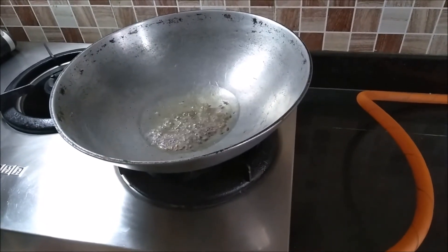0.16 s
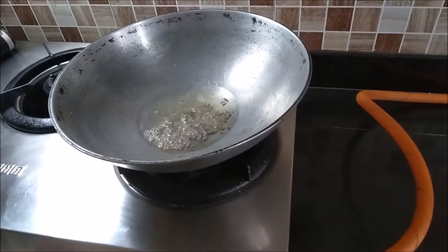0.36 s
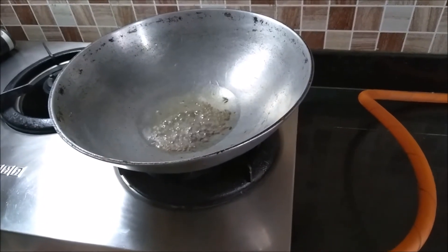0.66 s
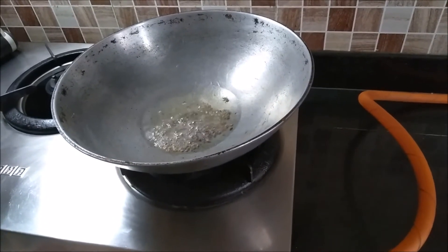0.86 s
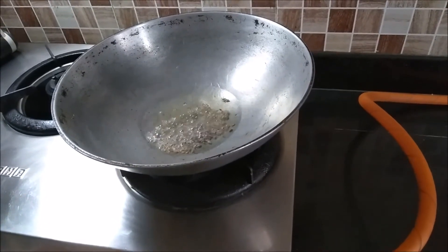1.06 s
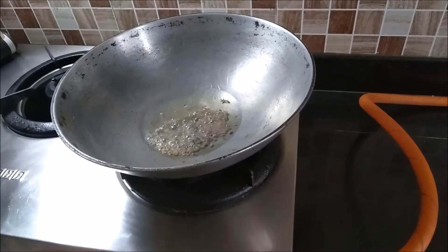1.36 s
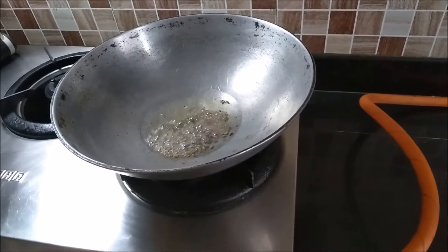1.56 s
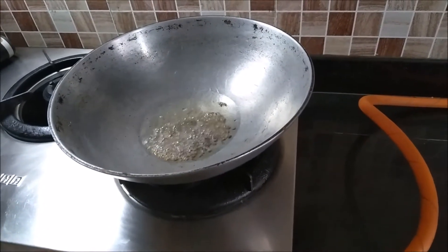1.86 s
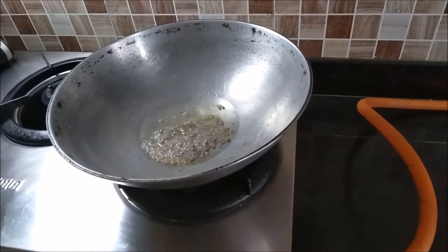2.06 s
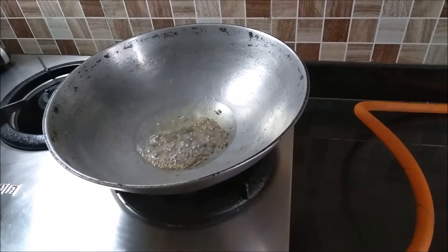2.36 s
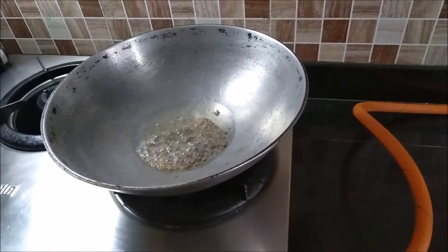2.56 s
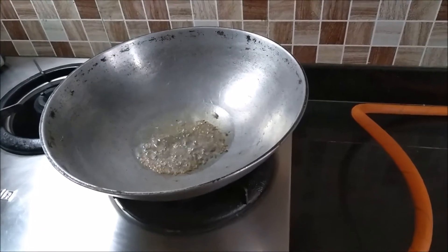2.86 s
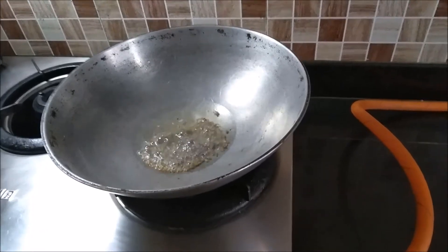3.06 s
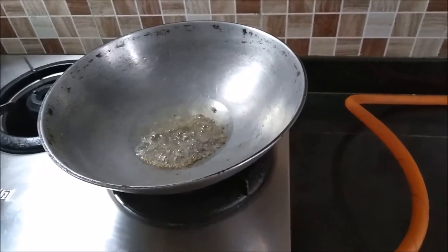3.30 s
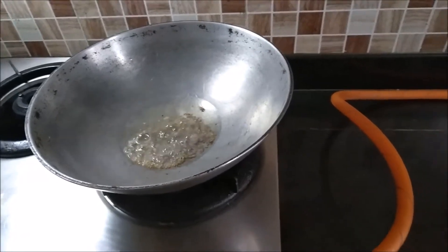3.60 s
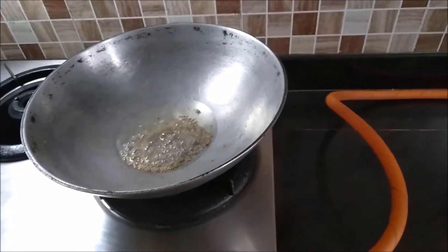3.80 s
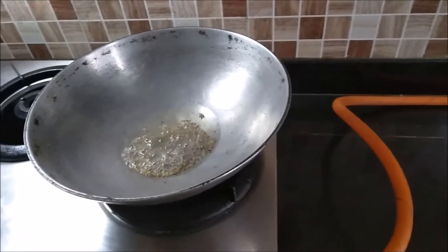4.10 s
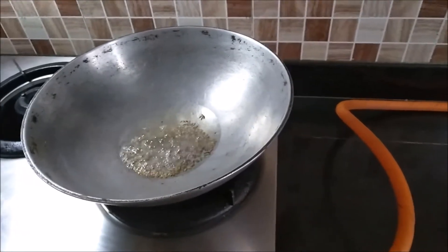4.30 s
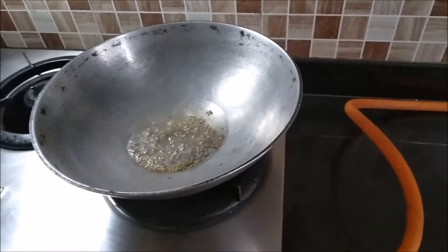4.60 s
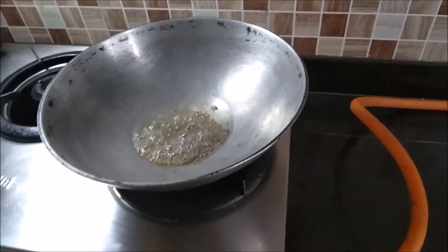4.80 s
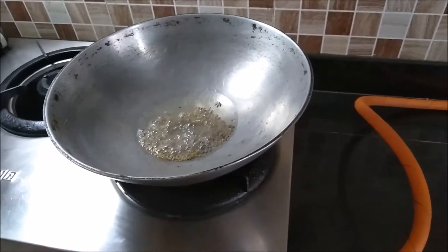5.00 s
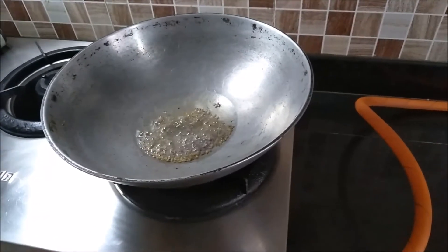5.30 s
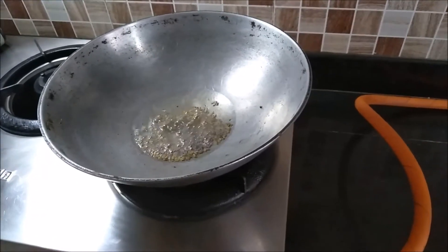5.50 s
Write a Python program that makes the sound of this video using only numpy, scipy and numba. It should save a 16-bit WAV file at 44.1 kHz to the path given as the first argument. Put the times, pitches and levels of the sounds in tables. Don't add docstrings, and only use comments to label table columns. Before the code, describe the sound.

Seeds crack sharply and irregularly in hot oil in a steel wok, with soft plops, over faint sizzle and low burner rumble.

```python
import sys
import numpy as np
from scipy import signal
from scipy.fft import rfft, irfft
from scipy.io import wavfile
from scipy.ndimage import uniform_filter1d
from numba import njit

SR = 44100
rng = np.random.default_rng(int(sys.argv[2]) if len(sys.argv) > 2 else 0)


def store_pcm(level_fs):
    pcm = np.round(np.clip(level_fs, -1, 1) * 32767).astype(np.int16)
    wavfile.write(sys.argv[1], SR, np.atleast_2d(pcm).T)


def gain_from_db(level_db):
    decades = np.asarray(level_db, float) / 20
    return 10 ** decades


N = 249165

# t/s, peak level/dB, centre f/Hz, treble level/dB, share thrown at the walls/dB
CRACKS = [(.1136, -8, 7670, -16.5, 2), (.3754, -28, 6920, -9.5, -7), (.8614, -34, 5260, -21.5, -9),
          (1.7348, -30, 6660, -5, 5), (1.9797, -34.5, 6400, -2, -12.5), (2.1632, -32.5, 6000, -24.5, 0),
          (2.3016, -29.5, 3960, -22, 2.5), (2.3527, -22, 5400, -17.5, -5), (2.6722, -33, 6180, -16, -3.5),
          (2.7921, -24.5, 7100, -11, 2), (3.0308, -34.5, 5700, -23, -7.5), (3.3237, -30.5, 4070, -15.5, 1),
          (3.7847, -33.5, 4420, -18.5, 1), (4.0811, -37.5, 5260, -21.5, -3), (4.4403, -31, 5100, -22, 2.5),
          (4.6803, -38, 5000, -16, -6), (4.9385, -31.5, 6460, -13, -12), (4.9867, -34, 5050, -29, -4.5),
          (5.0185, -33, 5560, -13.5, -16), (5.078, -36.5, 5200, -20.5, -4.5), (5.2914, -19, 4070, -18.5, 2),
          (5.3936, -21, 7440, -11.5, -9.5), (5.4254, -29.5, 7300, -4.5, -20), (5.517, -36, 4580, -26, -4.5)]
# t/s, peak level/dB, centre f/Hz
TICKS = [(0.2134, -55, 5400), (1.319, -53, 5200), (1.871, -55.5, 5800), (2.451, -48.5, 4740),
         (2.911, -47.5, 4370), (2.9779, -46.5, 4930), (3.2, -47.5, 5200), (3.4097, -41.5, 6250),
         (3.4454, -43.5, 4960), (3.676, -52.5, 5100), (4.3153, -42.5, 7900), (4.5336, -50, 5470),
         (4.654, -46.5, 4660), (4.8194, -41.5, 4770), (4.9623, -36.5, 4700), (5.196, -53, 4250),
         (5.4967, -39, 6500), (5.614, -56.5, 6180)]
SPLITS = [*CRACKS, *((*row, -17.5, -1.5) for row in TICKS)]
# f/Hz, level/dB
BED_TILT = [(500, -1), (2400, -1.5), (5000, -1), (8000, -3), (15000, 4.5)]
PORT_LAG = 6


def cracks(bus):
    highpass = signal.butter(3, 3300, "high", fs=SR, output="sos")
    for s, db, hz, treble_db, echo_db in SPLITS:
        spit_phase, crack_phase = rng.uniform(0, 2 * np.pi, 2)
        cycles = np.interp(db, [-41.5, -25.5], [1.83, 1.21])
        crack = gain_from_db(db + 5.5) * ring(hz, cycles, 0.0012, crack_phase)
        spit = gain_from_db(db + treble_db + 31) * ring(9400, 0.64, 0.018, spit_phase)
        crack, spit = signal.sosfilt(highpass, [crack, spit])
        bowl = rng.standard_normal(256)
        bowl[0] = 2.4
        direct = np.convolve(crack + 0.25 * spit, scatter(bowl, decay_s=0.002))
        add(bus, s, direct, crack + spit, -9.5 + echo_db, echo_db)


def plops(bus):
    # t/s, peak level/dB, pitch f/Hz, length/cycles
    pockets = [(.113, -34.5, 1980, 1.14), (.375, -48.5, 1880, 0.73), (1.318, -47.5, 1250, 0.37),
               (1.734, -41.5, 1640, 0.58), (1.979, -48.5, 1820, 0.71), (2.163, -27.5, 1930, 1.14),
               (2.3, -27.5, 1970, 1.12), (2.35, -32.5, 1760, 1.02), (2.453, -47.5, 2040, 0.82),
               (2.791, -43.5, 1700, 0.63), (2.979, -49.5, 2070, 1.7), (3.029, -32.5, 1620, 1.26),
               (3.031, -29, 2700, 0.74), (3.324, -29, 2210, .99), (3.785, -25.5, 2140, 0.73),
               (4.082, -39.5, 1380, 1.26), (4.083, -36, 2590, 0.77), (4.44, -31.5, 1610, 1.03),
               (4.441, -39, 3070, 1.44), (4.679, -33.5, 2030, 3.1), (4.68, -34.5, 2790, 2.5),
               (4.653, -43.5, 2480, 0.93), (4.962, -44, 1760, 0.94), (4.938, -37.5, 1770, 0.74),
               (4.986, -27, 2050, 0.81), (5.018, -31.5, 2640, 1.1), (5.077, -36, 1530, 1.08),
               (5.078, -36.5, 2740, 3.1), (5.291, -28, 2070, 0.85), (5.496, -45, 1640, 0.63)]
    # t/s, peak level/dB, pitch f/Hz, length/cycles
    thumps = [
        (3.321, -60, 840, 4.2),
        (3.784, -39.5, 894, 1.43),
        (3.785, -51, 435, 1.34),
        (4.678, -55, 810, 1.1),
        (5.392, -43, 860, 0.44),
    ]
    for s, db, hz, cycles in [*pockets, *thumps]:
        phase = rng.uniform(0, 2 * np.pi)
        plop = gain_from_db(db + 2.5) * ring(hz, max(cycles, 0.4), 0.033, phase)
        nearest = min(SPLITS, key=lambda row: abs(row[0] - s))
        echo_db = nearest[-1]
        add(bus, s, signal.fftconvolve(plop, struck_wok()), plop, -18.5 + echo_db, echo_db + 7.5)


def struck_wok():
    # f/Hz, level/dB, T60/s
    modes = [(1290, -44, .08), (1540, -41, .09), (1720, -42, .1), (2090, -40, .08), (2300, -44, .08),
             (2450, -46, .07)]
    t = np.arange(int(0.2 * SR)) / SR
    hz, db, t60 = np.transpose(modes)[..., None]
    scatter_db = 3 * rng.standard_normal((len(modes), 1))
    rings = gain_from_db(db + scatter_db - 60 * t / t60) * np.sin(2 * np.pi * hz * t)
    return rings.sum(axis=0) + (t == 0)


def knocks(bus):
    # t/s, peak level/dB, pitch f/Hz, length/cycles
    landings = [
        (0.216, -39.5, 1380, 1.9),
        (0.215, -42, 855, 1.85),
        (.259, -53, 780, 1.7),
        (.286, -38, 1160, 1.23),
        (0.861, -43.5, 1246, 2.5),
        (3.676, -43.5, 1330, .9),
        (4.818, -40.5, 1420, 2.25),
        (5.615, -42.5, 1940, 0.73),
    ]
    for s, db, hz, cycles in landings:
        phase = rng.uniform(0, 2 * np.pi)
        knock = gain_from_db(db + 1.5) * ring(hz, max(cycles, 0.4), 0.012, phase)
        add(bus, s, knock, knock, left_db=-2.5, echo_db=0)


def rim():
    # t/s, f/Hz, level/dB, T60/s
    mode = (5.1, 1039, -74, .9)
    s, hz, db, t60 = mode
    t = np.maximum(np.arange(N) / SR - s, 0)
    return gain_from_db(db - 60 * t / t60) * np.sin(2 * np.pi * hz * t)


def kitchen():
    # delay t/s, left level/dB, right level/dB
    tiles = [
        (.0016, -5, -14),
        (.0085, 0, -8),
        (.0115, 0, -8),
        (.0168, -1, -10),
    ]
    # f/Hz, T60/s
    room_t60 = [(300, 0.07), (2000, 0.12), (6000, 0.19), (14000, 0.057)]
    # f/Hz, level/dB
    echo_tilt = [(500, -1), (1400, -6), (2400, -4), (6000, 1), (8500, 14), (15000, 11)]
    # t/s at left, right
    hold_s = [0.035, 0.034]
    t = np.arange(int(0.6 * SR)) / SR
    lumps = gain_from_db(1.5 * np.array([walk(1000), walk(900)]))
    grain = rfft((pair(560, echo_tilt) * lumps)[:, :len(t)])
    hz = np.fft.rfftfreq(len(t), 1 / SR)

    after_hold = t - np.array(hold_s)[:, None]
    fading = 0.008 * np.logaddexp(0, after_hold / 0.008) + 0.15 * t
    late = gain_from_db(-11.5 - 60 * t / 0.31)
    tail = 0
    for centre in 125 * 2.0 ** np.arange(8):
        band = np.clip(1 - abs(np.log2(np.maximum(hz, 125) / centre)), 0, 1)
        decay = gain_from_db(-60 * fading / on_log(room_t60, centre)) + late
        tail = tail + irfft(grain * band, len(t)) * decay
    build_up = 1 - np.exp(-(t / 0.0039) ** 2)
    tail = gain_from_db(-35.5) * tail / np.std(tail[:, :int(0.03 * SR)]) * build_up

    faces = scatter(rng.standard_normal((len(tiles), 2, 256)), decay_s=0.0008)
    for (s, left_db, right_db), face in zip(tiles, faces):
        i = int(s * SR)
        tail[:, i:i + face.shape[1]] += gain_from_db(np.array([[left_db], [right_db]]) - 13.5) * face
    return tail


def sizzle(db):
    # f/Hz, level/dB per Hz
    hiss = [(600, -22), (1500, 1.5), (2700, 0), (3100, -14), (3700, -11), (4200, -6.5), (6000, -0.5),
            (10000, 1), (13000, -2.5), (16000, 6.5)]
    pops = rng.random(N) < 400 / SR
    prickle = pops * gain_from_db(2.08 * rng.exponential(size=N))
    smear = 1 + 0.13 * signal.lfilter([1], [1, -np.exp(-1 / (0.0018 * SR))], prickle)
    drift_db = 0.6 * walk(6)
    return gain_from_db(db - 7.0 + drift_db) * unit(colour(pair(1700, BED_TILT) * smear, hiss))


def flare(wet):
    spatter = uniform_filter1d(abs(wet).max(axis=0), int(0.026 * SR))
    return 12.5 * spatter / (spatter + gain_from_db(-54))


def burner(db):
    # f/Hz, level/dB per Hz
    flame = [(15, -47), (25, -17), (70, -4), (136, 4), (220, -10.5), (252, -2), (278, -8.5), (452, -11.5),
             (549, -14.5), (617, -14), (826, -15), (1480, -24), (2600, -56.5), (3380, -29), (5720, -120)]
    hum_hz, hum_width_hz, hum_db = 143, 11.0, -8
    roar = unit(colour(pair(670, BED_TILT), flame))
    b, a = signal.iirpeak(hum_hz, hum_hz / hum_width_hz, fs=SR)
    hum = gain_from_db(hum_db) * unit(signal.lfilter(b, a, rng.standard_normal(N)))
    drift_db = 0.4 * walk(2.47)
    return gain_from_db(db - 4.5 + drift_db) * (roar + hum)


def ring(hz, cycles, glide, phase):
    turns = np.arange(int(0.03 * SR)) / SR * hz
    age = turns / cycles
    shape = (age * np.exp(-age)) ** 3
    return shape / shape.max() * np.sin(2 * np.pi * turns * (1 + glide * np.minimum(age, 3)) + phase)


def scatter(chance, decay_s):
    smear = chance * np.exp(-np.arange(chance.shape[-1]) / (decay_s * SR))
    return smear / np.sqrt(np.sum(smear ** 2, axis=-1, keepdims=True))


def add(bus, s, direct, echo, left_db, echo_db):
    i = int(s * SR)
    bus[:2, i:i + len(direct)] += direct[:N - i] * gain_from_db(np.array([[left_db], [0]]))
    bus[2, i:i + len(echo)] += echo[:N - i] * gain_from_db(echo_db)


def pair(alike_hz, tilt):
    common, apart = rng.standard_normal(N), rng.standard_normal((2, N))
    hz = np.fft.rfftfreq(N, 1 / SR)
    alike = 1 / (1 + (hz / alike_hz) ** 1.52)
    shared = rfft([np.roll(common, PORT_LAG), common])
    ports = gain_from_db(np.outer([0.5, -0.5], on_log(tilt, hz)))
    return irfft(ports * (np.sqrt(alike) * shared + np.sqrt(1 - alike) * rfft(apart)), N)


def walk(rate):
    k = int(SR / rate)
    steps = np.repeat(rng.standard_normal(N // k + 1), k)
    return unit(uniform_filter1d(uniform_filter1d(steps, k), k)[:N])


def on_log(points, hz):
    p = np.array(points, float)
    return np.interp(np.log(np.maximum(hz, 1)), np.log(p[:, 0]), p[:, 1])


def unit(x):
    return x / np.sqrt(np.mean(x ** 2))


def colour(x, points):
    size = 2 ** 12
    c = irfft(np.log(gain_from_db(on_log(points, np.fft.rfftfreq(size, 1 / SR)))))
    c[1:size // 2] *= 2
    c[size // 2 + 1:] = 0
    response = irfft(np.exp(rfft(c)))
    return signal.fftconvolve(x, response.reshape((1,) * (x.ndim - 1) + (-1,)), axes=-1)[..., :N]


@njit
def follow(x, attack, release):
    e, out = 1e-6, np.empty(len(x))
    for i in range(len(x)):
        e += (x[i] - e) * (attack if x[i] > e else release)
        out[i] = e
    return out


def limiter(x):
    knee_db, ratio, attack_s, release_s = -24, 3.24, 0.002, 0.006
    bass = signal.sosfiltfilt(signal.butter(2, 960, fs=SR, output="sos"), x)
    upper = x - bass
    level = follow(abs(upper).max(axis=0), 1 / (attack_s * SR), 1 / (release_s * SR))
    gain = np.minimum(gain_from_db(knee_db) / level, 1) ** (1 - 1 / ratio)
    return bass + upper * gain


def scene():
    # t/s, sizzle level/dB, burner level/dB
    heat = [
        (0.0, -51.5, -62.5),
        (0.28, -50.5, -68.5),
        (0.45, -54.5, -65.5),
        (1.64, -55, -66.5),
        (2.36, -54, -66.5),
        (2.88, -52, -65.5),
        (3.15, -56, -65.5),
        (4.44, -55.5, -65),
        (5.65, -52.5, -66),
    ]
    s, *columns = np.transpose(heat)
    sizzle_db, burner_db = (np.interp(np.arange(N) / SR, s, c) for c in columns)
    bus = np.zeros((3, N))
    cracks(bus)
    plops(bus)
    knocks(bus)
    left, right, echo = bus
    direct = np.array([np.roll(left, PORT_LAG), right])
    wet = signal.fftconvolve(echo[None], kitchen(), axes=1)[:, :N]
    return direct + wet + rim() + sizzle(sizzle_db) + burner(burner_db + flare(wet))


def low_pass(x):
    return signal.sosfilt(signal.butter(12, 16000, fs=SR, output="sos"), x)


def record(dry):
    # f/Hz, level/dB
    response = [(60, -11), (150, 2.5), (2600, 5.5), (3600, 1.5), (4200, 14.5), (6000, 13.5), (7600, 12.5),
                (8300, -1), (11000, -4.5), (15700, -12.5), (16300, -31)]
    return low_pass(limiter(colour(dry, response)))


dry = scene()
out = record(dry)
store_pcm(out)
```